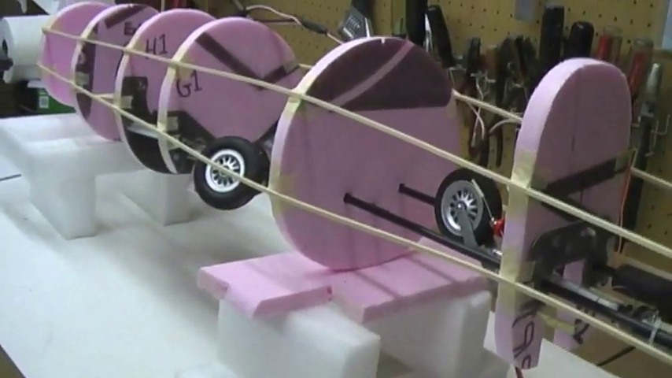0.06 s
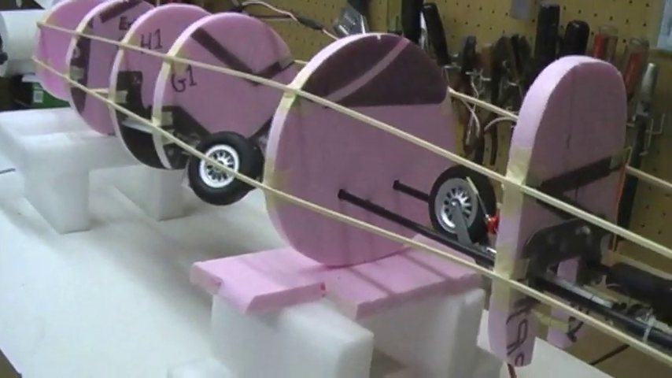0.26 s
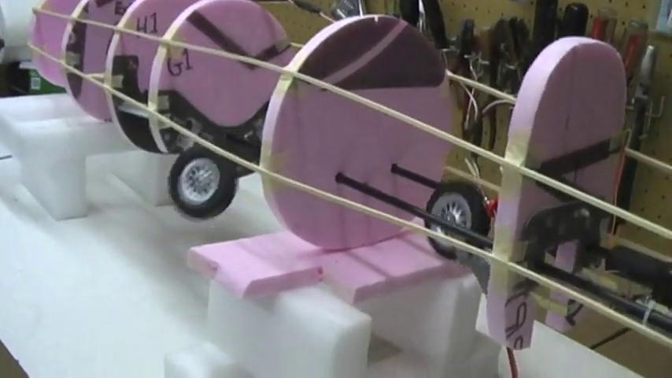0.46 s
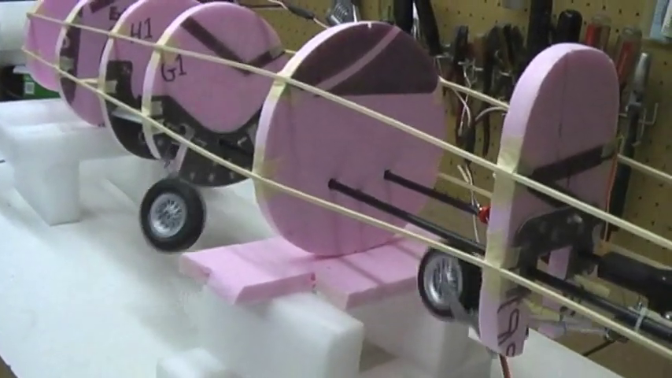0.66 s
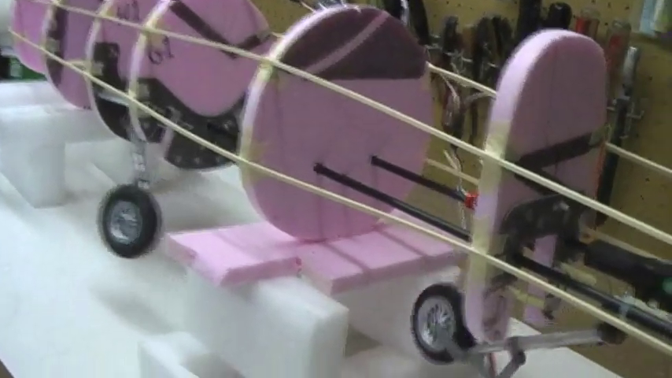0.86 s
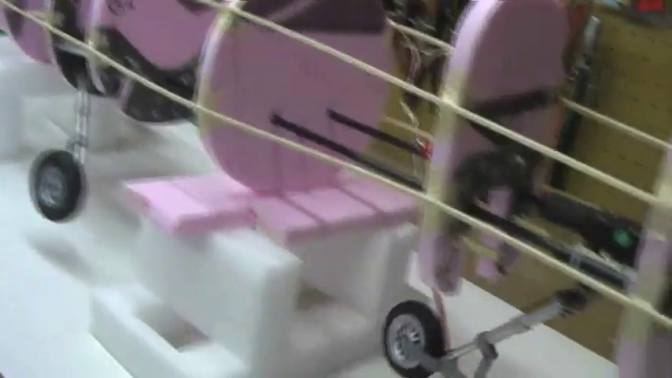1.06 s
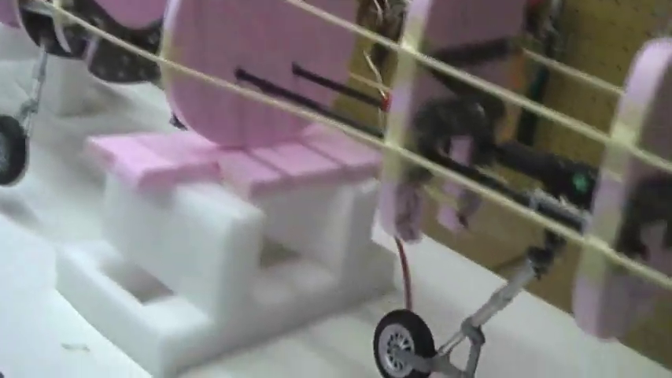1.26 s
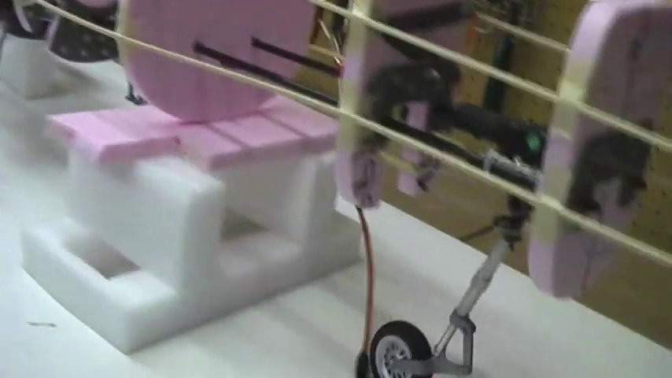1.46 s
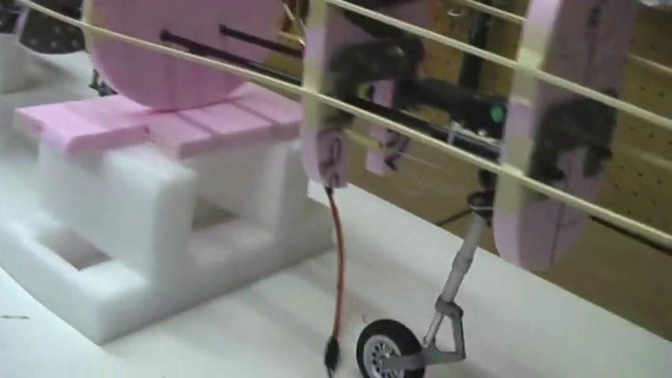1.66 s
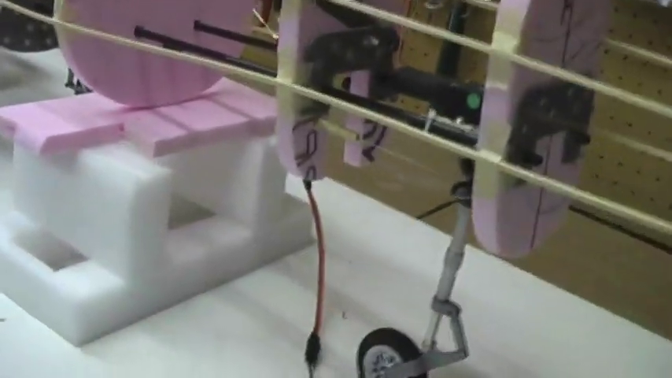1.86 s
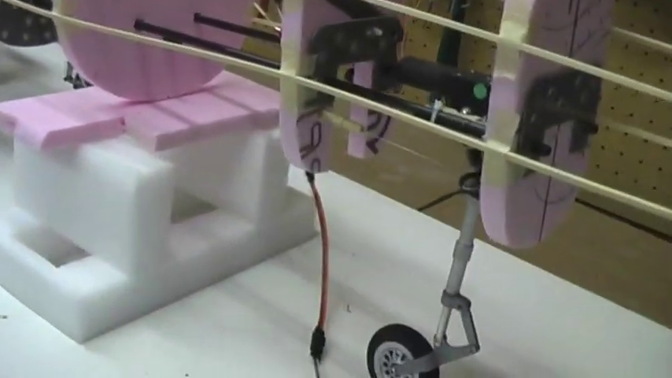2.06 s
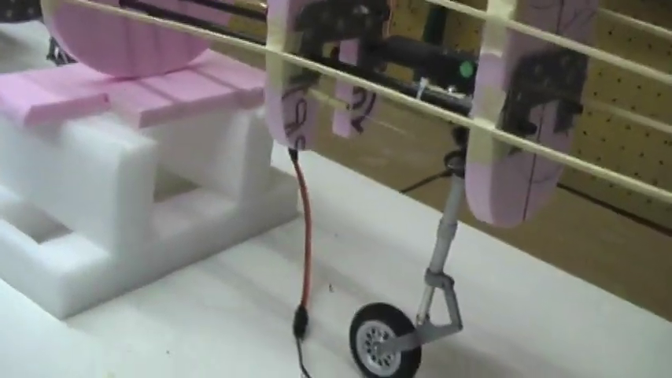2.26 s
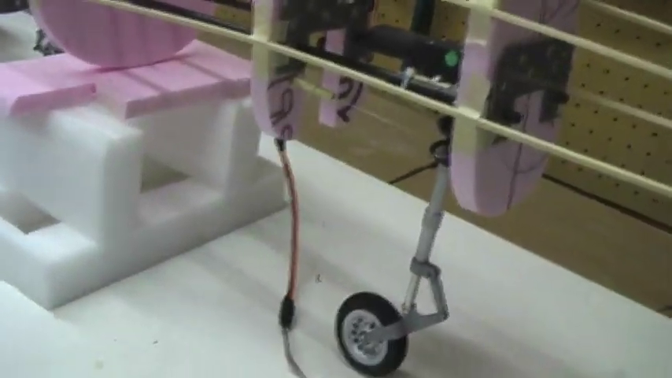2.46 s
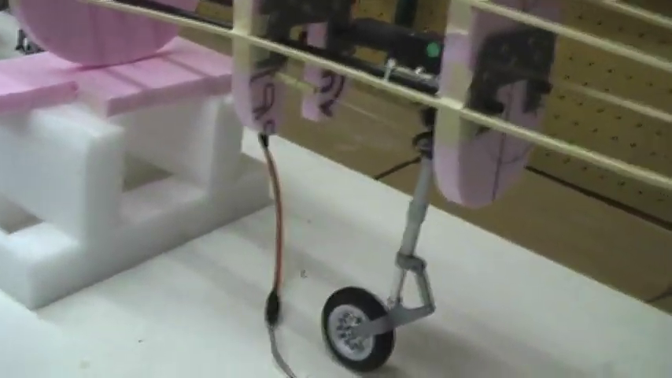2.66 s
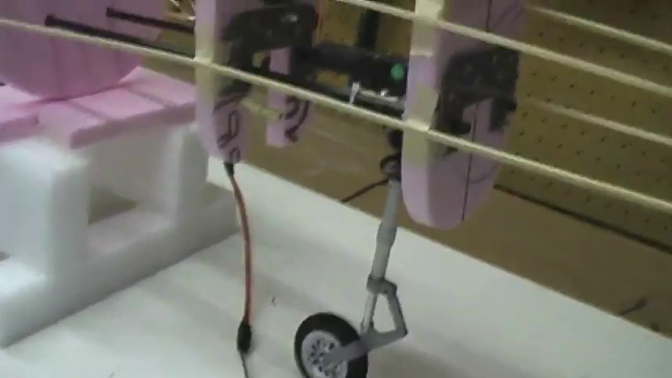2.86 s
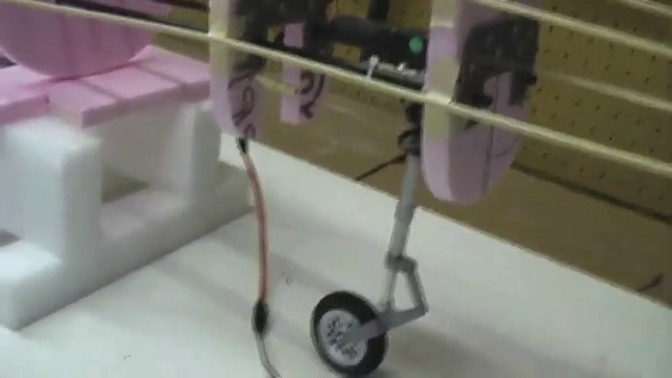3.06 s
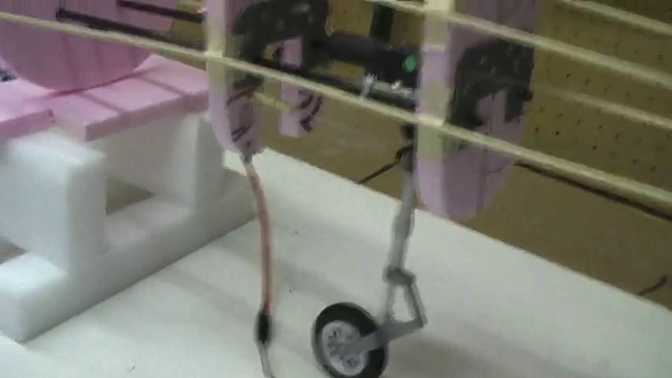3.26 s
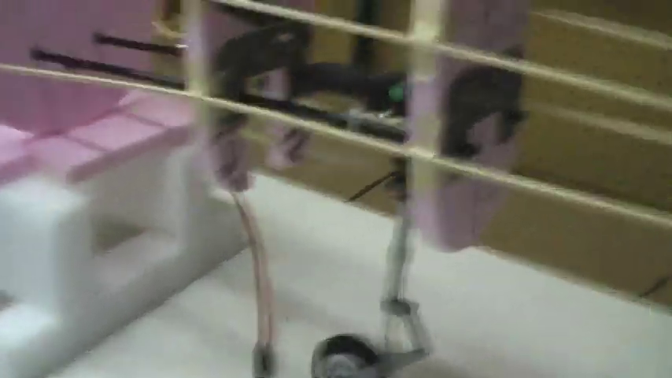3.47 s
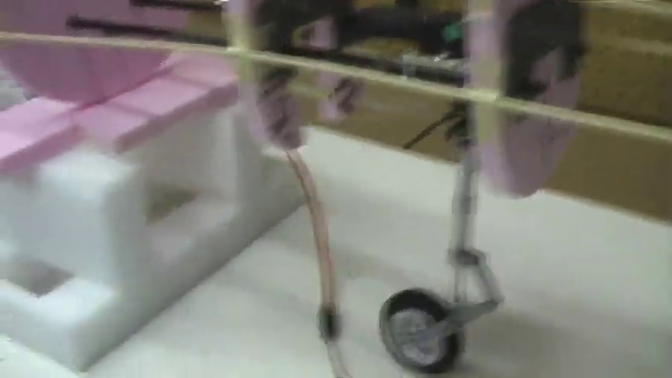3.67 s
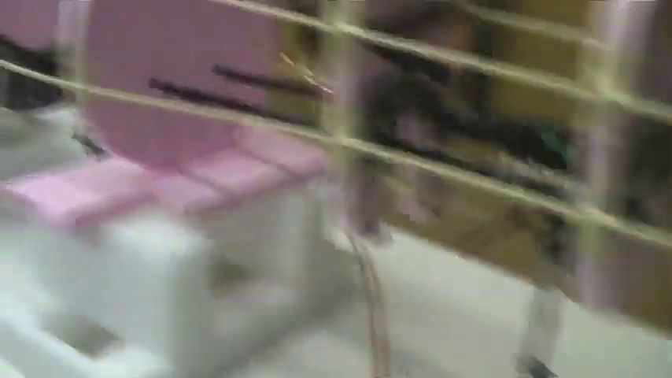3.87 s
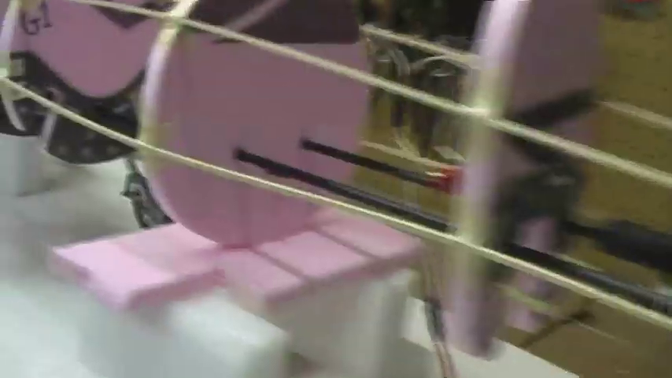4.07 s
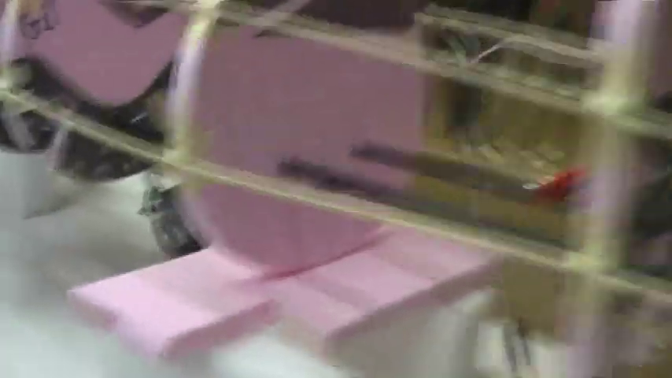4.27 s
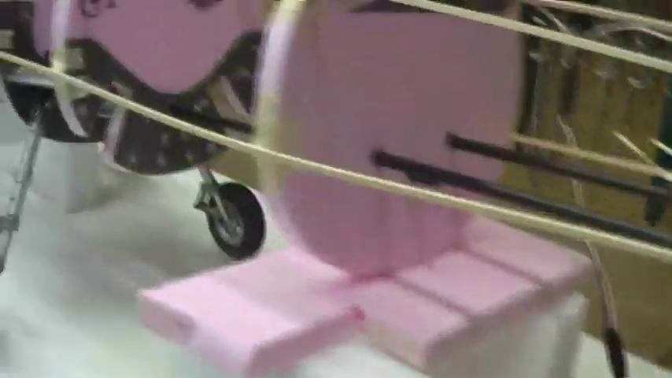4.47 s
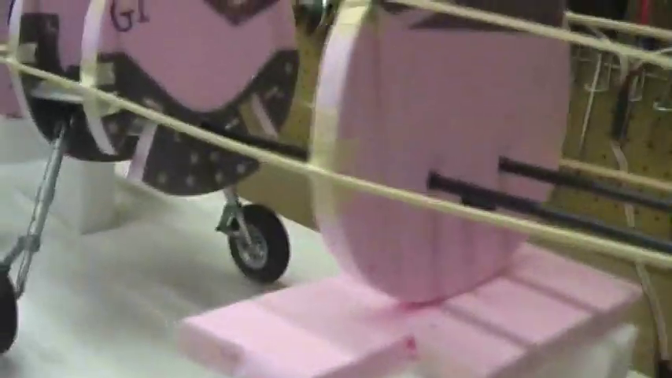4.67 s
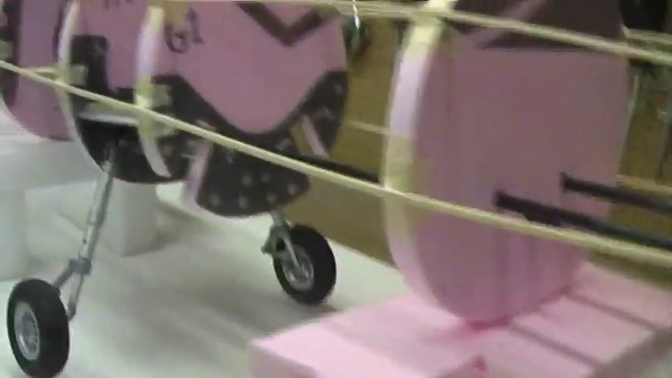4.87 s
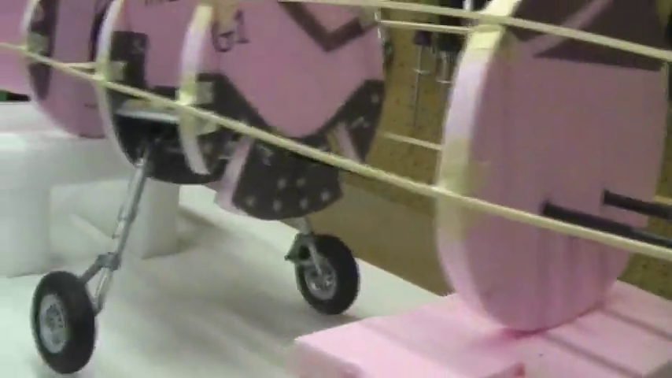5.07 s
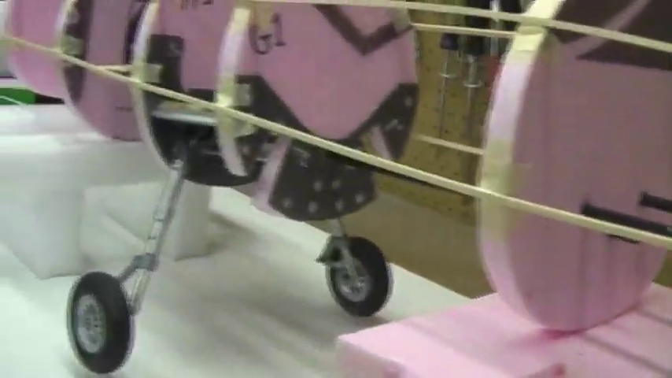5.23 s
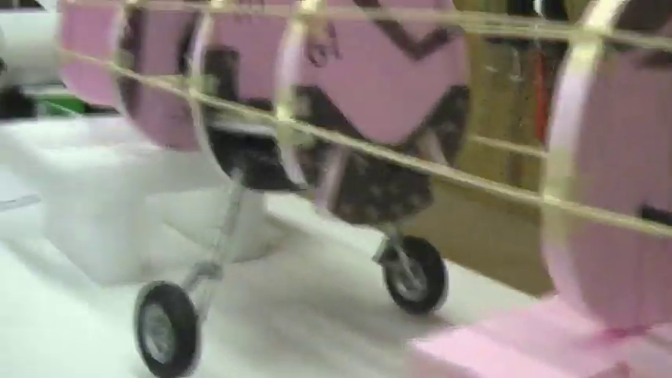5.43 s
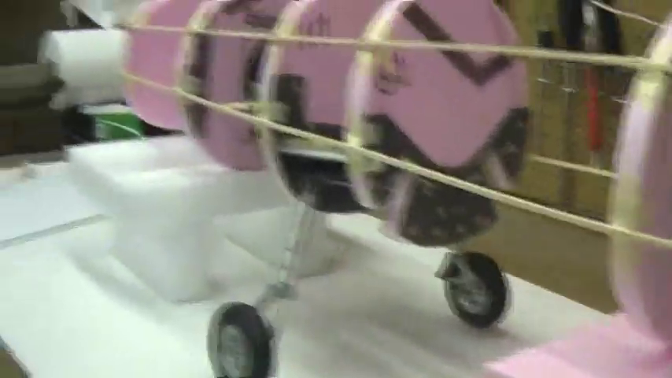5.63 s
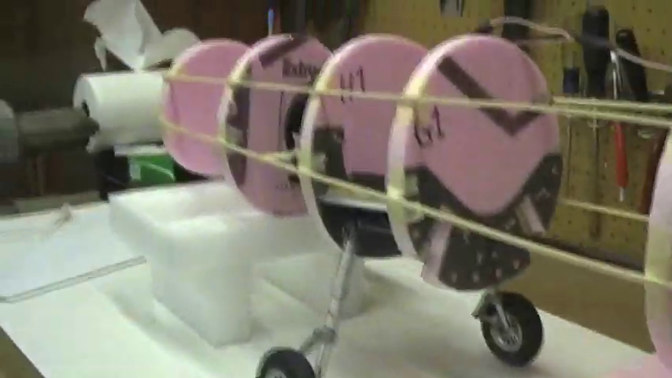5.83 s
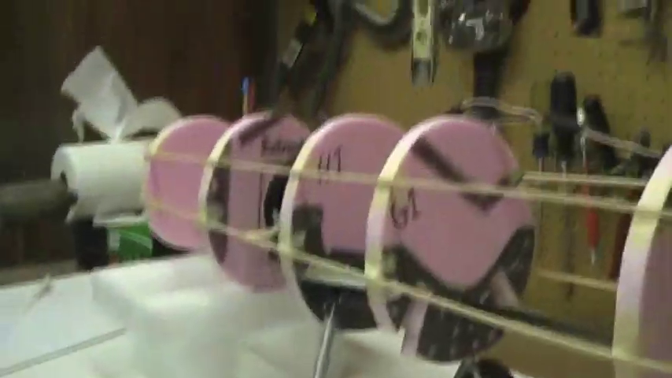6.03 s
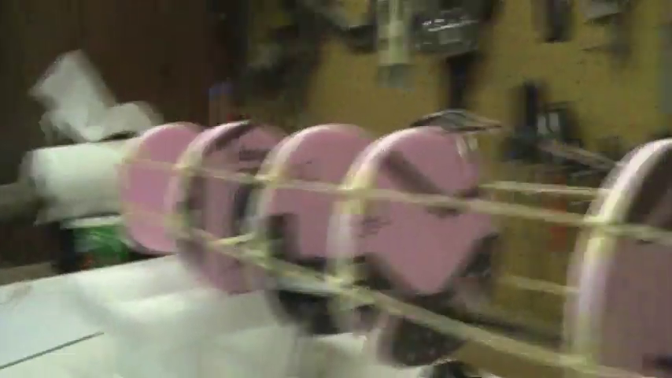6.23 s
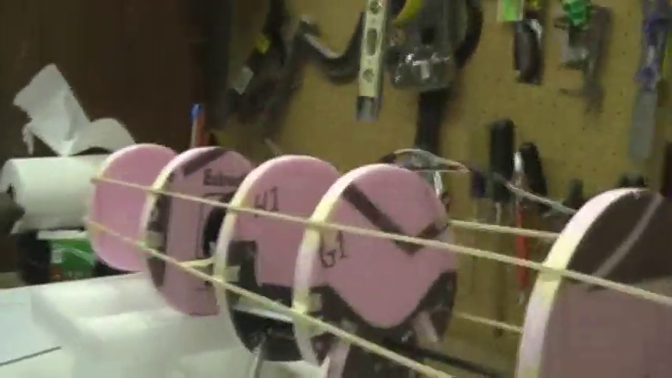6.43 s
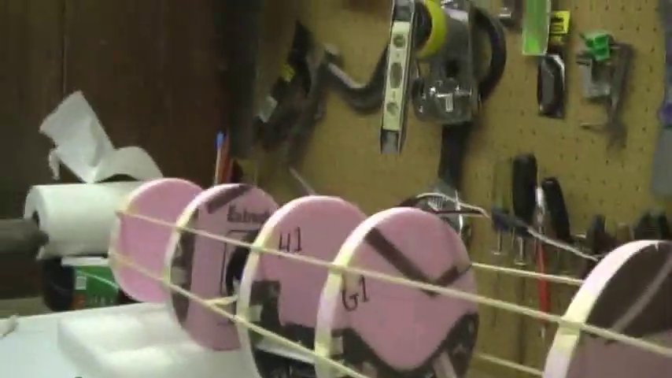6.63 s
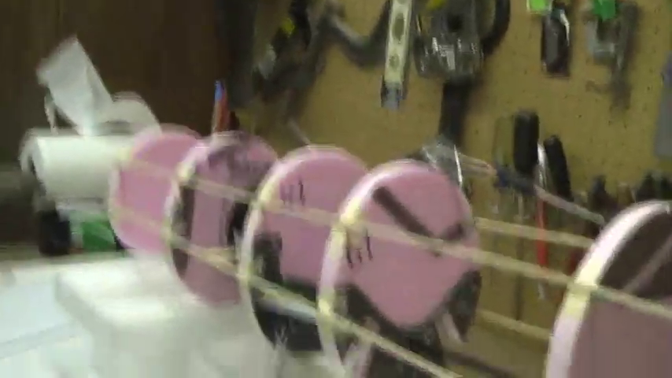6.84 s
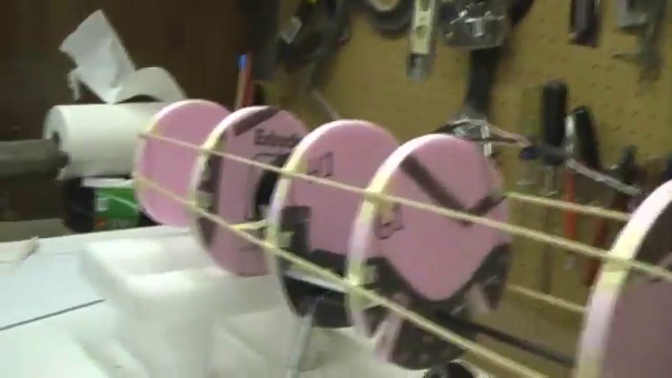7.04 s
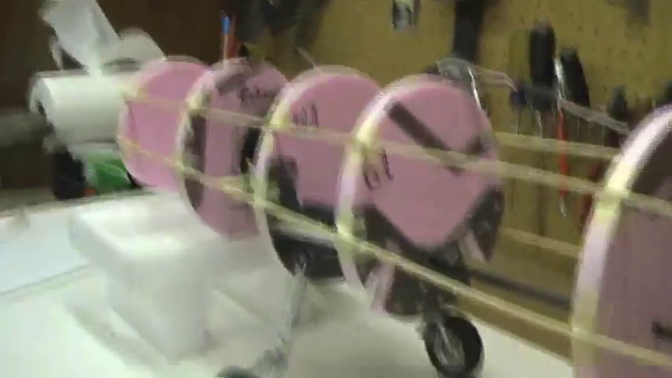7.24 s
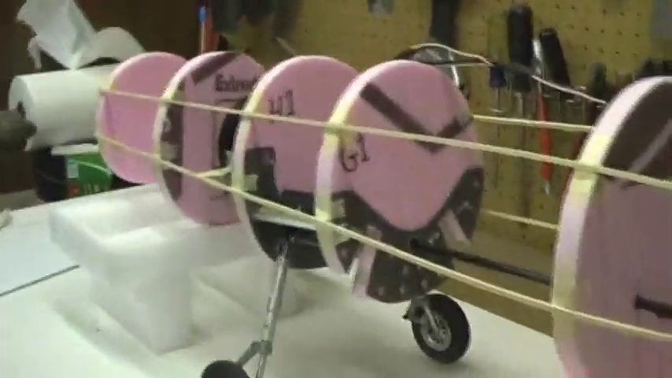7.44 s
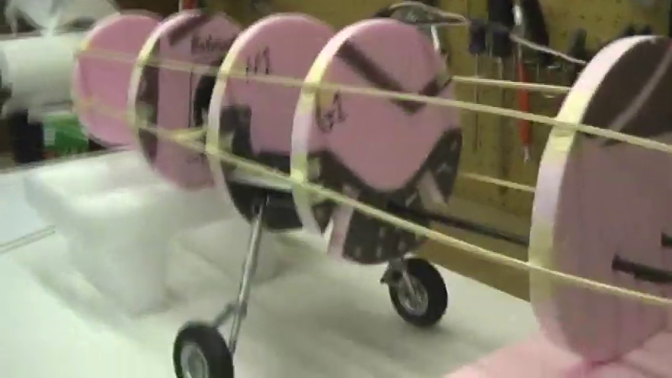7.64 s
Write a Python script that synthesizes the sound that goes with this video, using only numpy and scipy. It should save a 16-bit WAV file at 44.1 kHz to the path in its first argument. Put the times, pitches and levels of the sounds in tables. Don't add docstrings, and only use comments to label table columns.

```python
import sys
import numpy as np
from scipy import signal
from scipy.fft import rfft, irfft
from scipy.io import wavfile

SR = 44100
rng = np.random.default_rng(int(sys.argv[2]) if len(sys.argv) > 2 else 0)


def level_to_linear(level):
    exponent = np.asarray(level, float) / 20
    return 10 ** exponent


def materialize(psi):
    bounded = np.clip(np.atleast_2d(psi).T, -1, 1)
    quanta = np.round(bounded * 32767).astype(np.int16)
    wavfile.write(sys.argv[1], SR, quanta)


N = 339570
TIME = np.arange(N) / SR
BENCH = round(2.5 * SR)
SIZE = 3 * 2 ** 17
HZ = np.maximum(np.arange(SIZE // 2 + 1) * SR / SIZE, 1)

# (frequency [Hz], level [dB])
SHOP_COLOUR = [(20, -26.5), (50, -0.5), (100, 0.5), (160, -5.5), (400, -1.5), (1000, -5.5), (5000, -22),
               (11000, -20), (15500, -32.5)]
# (frequency [Hz], width [Hz], level [dB])
SHOP_HUM = [(145, 12, -76.5), (250, 5.7, -69), (400, 22, -64), (495, 30, -71.5)]
# (frequency [Hz], side minus mid [dB])
MOTOR_SIDE = [(60, -8.5), (150, -16), (380, -22), (950, -25.5), (2380, -21.5), (5980, -12), (15000, -1)]
NEAR_SIDE = [(60, -7), (150, -7), (380, -6.5), (950, -8), (2380, -6.5), (5980, -6), (15000, 2.5)]
# (time [s], left minus right [dB])
SIDE_STEP = [
    (0, -2.5),
    (6.3, 0),
    (6.7, 1),
    (7.7, 4.5),
]

# (frequency [Hz], level per Hz [dB])
CLOTH_COLOUR = [(59, -44), (100, -6.5), (429, -3.5), (654, -9.5), (1180, -5), (2300, -5), (4200, -21),
                (11500, -31.5), (13900, -35.5), (15500, -46.5)]
STRAP_COLOUR = [(59, -47), (100, -9.5), (214, -2.5), (614, -6.5), (808, -6.5), (1800, -0.5), (2520, -8),
                (5750, -4), (14500, -20), (15500, -27.5)]
# (time [s], rise [s], fall [s], level [dB], fineness [0 scuff, 1 swish, 2 crinkle, 3 hiss])
STROKES = [(.13, 0.12, 0.21, -57, 1.1), (3.25, 0.18, 2.2, -55, 0.32), (3.42, 0.34, 0.086, -54, .8),
           (3.47, 0.052, 0.11, -36.5, 1.41), (3.69, 0.075, 0.064, -43, 1.16),
           (3.758, .006, 0.23, -43, 0.41), (3.82, 0.053, 0.071, -32, 1.77),
           (3.92, 0.074, 0.23, -45.5, 0.37), (3.99, 0.077, 0.14, -49.5, 2.1),
           (4.1, 0.038, 0.093, -31, 1.06), (4.159, 0.054, 0.25, -51.5, 0.94),
           (4.38, 0.11, 0.065, -49.5, 2.47), (4.452, 0.22, 0.16, -52, 0.22),
           (4.483, 0.04, 0.089, -39.5, 1.36), (4.69, 0.17, .22, -49.5, 0.67), (4.66, 0.14, 0.34, -59, 2.69),
           (5.458, 0.1, 0.092, -51.5, 2.7), (5.7, 1.25, 1.06, -61.5, 1.28), (6.274, 0.022, 0.078, -42, 2.7),
           (6.45, 0.18, 0.23, -44, 2.62), (6.601, 0.7, 0.17, -52.5, 0.36),
           (6.675, 0.12, 0.15, -50.5, 0.089), (6.78, 0.25, .1, -56, 3.1)]
# (time [s], rise [s], fall [s], level [dB], fineness [0-3])
SLIDES = [(6.83, 0.061, 0.18, -53.5, .1), (6.853, 0.16, 0.22, -40, 2.13), (6.96, .2, 0.19, -62.5, .1),
          (7.04, 0.19, 0.68, -39.5, 2.1), (7.24, 0.51, .3, -41, 1.67), (7.258, .008, 0.064, -40.5, 2.3),
          (7.441, 0.38, 0.11, -37.5, 1.7), (7.45, 0.18, 0.29, -53.5, 0.11), (7.665, .06, .03, -43.5, 0.81),
          (7.7, .05, .1, -42, 2.1)]
# (time [s], length [s], ring [Hz], blur [Hz], level [dB])
SHOE_RUBS = [
    (3.08, .36, 515, 40, -50),
    (3.25, .13, 1310, 50, -54),
             (3.8, .09, 2202, 250, -37),
    (3.799, 0.064, 3440, 400, -40),
    (4.079, 0.065, 2140, 200, -33),
    (4.084, .04, 3140, 300, -37),
    (6.46, .2, 85, 35, -56),
    (6.55, .1, 170, 60, -56),
    (6.78, .2, 100, 40, -58),
    (7.36, .12, 85, 30, -62),
    (2.17, .06, 1650, 250, -40),
]

# (time [s], peak [dB], ring [Hz], t60 [s])
KNOCKS = [(3.756, -31.5, 458, 0.046), (3.891, -23, 250, 0.031), (3.916, -25.5, 333.5, 0.017),
          (4.065, -30, 337, 0.017), (4.411, -35, 650, 0.03), (4.43, -38.5, 1040, 0.037),
          (4.443, -38, 228.5, 0.087), (6.258, -37, 210.7, 0.066), (6.586, -29.5, 235, 0.023),
          (6.656, -16, 844, 0.016), (6.687, -34.5, 430, 0.019), (6.787, -20, 1265, 0.0085),
          (6.797, -16.5, 1395, 0.011), (6.816, -26.5, 327, 0.027), (6.849, -31, 202, 0.048),
          (6.885, -27, 354.7, 0.019), (6.942, -24, 217, 0.026), (6.967, -28.5, 204.6, 0.033),
          (7.618, -26, 520.4, 0.022), (7.651, -27.5, 609.4, 0.022)]
# (time [s], peak [dB], ring [Hz])
TICKS = [(4.1313, -25, 2230), (4.2389, -37, 2500), (4.4149, -39, 6890), (4.4308, -35, 2210),
         (5.1175, -46, 2400), (5.1205, -48, 5700), (6.2629, -33, 5570), (6.6115, -26.5, 4300),
         (6.6484, -19, 4530), (6.6551, -27, 4170), (6.786, -9.5, 5750), (6.7978, -22, 1830),
         (6.8061, -18.5, 7050), (6.8485, -22, 6750), (7.1769, -40, 6400), (7.228, -23, 5290),
         (7.2521, -14.5, 2650), (7.2522, -9.5, 4700), (7.2785, -13.5, 5340), (7.2965, -18, 5230),
         (7.3405, -24, 4260), (7.3375, -32, 4400), (7.3305, -34, 6000), (7.365, -20, 5680),
         (7.439, -21, 6340), (6.8189, -20.5, 10060), (7.6159, -27.5, 1880), (7.649, -21.5, 5800),
         (4.511, -32, 2190), (7.6954, -31, 5510), (3.673, -33, 1970), (4.064, -36, 2000)]
# (time [s], length [s], first pitch [Hz], last pitch [Hz], peak [dB])
CREAK = (4.366, .030, 330, 510, -31)
# (time [s], level [dB], t60 [s])
RATTLES = [
    (7.254, -29.5, 0.12),
    (7.2765, -31, .06),
    (7.297, -29.5, 0.099),
    (6.788, -32, 0.061),
    (6.6125, -37.5, 0.055),
]
# (frequency [Hz], width [Hz], level [dB])
BUCKLE = [(2500, 600, 2), (3630, 500, 1.5), (5340, 900, -1), (6160, 600, -6)]
# (time [s], peak [dB])
PINGS = [
    (4.954, -59),
    (5.117, -53),
    (5.1205, -51),
    (5.252, -57),
]
# (frequency [Hz], level [dB], t60 [s])
PART = [(1900, -2, .03), (2850, -3, .05), (4050, -9, .09), (5700, -3, .025), (6400, -6, .02),
        (8400, -4, .015)]

# (frequency [Hz], level per Hz [dB])
GEAR_COLOUR = [(100, -23.5), (500, -7), (900, -16.5), (1050, -10), (1400, -8), (3600, -9.5), (4500, -5.5),
               (9000, -7), (12000, -4), (14000, -13.5), (15500, -27)]
# (frequency [Hz], width [Hz], level [dB])
GEARBOX = [(1308, 160, -2.5), (2250, 200, -5), (4470, 300, -1), (5360, 250, -3), (6360, 310, -3),
           (9130, 1500, 4)]
# (turns per second [Hz], depth [0-1])
BEATS = [(218, 0.05)]
# (time [s], length [s], first pitch [Hz], last pitch [Hz], level against the rattle [dB])
WHINE = [(.34, .075, 4560, 4620, -5), (.345, .11, 5200, 5300, -3), (.33, .10, 9300, 9200, -5),
         (.345, .115, 4200, 6450, -2), (.38, .13, 6130, 6220, -7), (.39, .11, 4140, 4120, -7),
         (.42, .14, 4970, 5020, -9), (.33, .25, 5740, 5770, -12), (.33, .8, 1165, 1095, -16),
         (.33, .55, 1310, 1285, -14), (.82, .55, 1290, 1320, -10), (1.3, .65, 1345, 1320, -8),
         (.33, .1, 1910, 1850, -11), (.42, .35, 1890, 1950, -8), (.7, .52, 1945, 1975, -13),
         (.45, .55, 1530, 1550, -14), (.58, .6, 2335, 2345, -9), (1.2, .32, 2350, 2345, -9),
         (.68, .56, 2240, 2200, -10), (1.34, .4, 2190, 2255, -9), (.35, .6, 2910, 2850, -14),
         (.6, .4, 3160, 3190, -13), (1.06, .3, 3200, 3150, -12), (1.33, .4, 3165, 3230, -11),
         (.42, .26, 4390, 4335, -8), (.64, .36, 4320, 4385, -9), (.94, .47, 4385, 4350, -5),
         (1.39, .28, 4500, 4600, -6), (1.39, .32, 4410, 4455, -9), (.85, .45, 4020, 4070, -14),
         (.68, .28, 5240, 5320, -10), (1.14, .42, 5290, 5270, -11), (1.17, .2, 4920, 4945, -10),
         (.55, .46, 6480, 6460, -8), (.7, .32, 6640, 6690, -9), (.8, .42, 5760, 5740, -12),
         (1.4, .26, 6430, 6480, -12), (.5, .95, 8950, 8950, -7), (1.35, .35, 8800, 8700, -7),
         (2.18, .26, 4400, 4380, -3)]
# (time [s], rate [Hz])
SPEED = [
    (.32, 603),
    (.45, 650),
    (.75, 652),
    (1.0, 657),
    (1.35, 652.6),
    (1.55, 683),
    (1.72, 711),
    (1.9, 652),
    (2.3, 637),
]
# (time [s], rattle [dB])
BINDING = [
    (1.6, 0.0),
    (1.7, -3.0),
    (1.95, -5.5),
    (2.2, -6.5),
    (2.26, -1.0),
]
# (time [s], near train [dB], far train [dB])
EFFORT = [
    (.318, -42.5, -43),
    (.33, -28, -29),
    (.36, -17.5, -29.5),
    (.51, -19.5, -25.5),
    (1.3, -19, -25.5),
    (1.55, -21, -24.5),
    (1.83, -15.5, -24),
    (1.92, -21, -22),
    (2.14, -14.5, -24),
]
# one level [dB] each for rumble, rattle, buzz, hiss
NEAR_DB = [-43, -11.5, -8, 2]
FAR_DB = [-28, 1.5, -0.5, -15.5]
COAST_DB_PER_S = [250, 340, 279, 423.3]
# (time [s], rise [s], fall [s], level [dB])
SHAKES = [
    (.51, 0.083, 0.16, -42),
    (1.55, 0.13, 0.67, -51),
    (1.92, .6, .4, -45.5),
]
# (time [s], rise [s], fall [s], level [dB])
COMMUTATOR = [
    (.4, 0.11, .8, -55.5),
    (.97, 1.6, 0.61, -43),
    (1.55, 0.67, 0.34, -40.5),
    (1.8, .8, 0.18, -44),
]
# (time [s], rise [s], fall [s], level [dB])
SHAFT = [
    (.51, 0.24, 0.36, -54.5),
    (.8, 0.26, 0.22, -49.5),
    (1.27, 1.1, .14, -58),
    (1.55, 0.14, .35, -46.5),
    (1.8, 0.58, .1, -48.5),
]
# (time [s], length [s], first slip rate [Hz], last slip rate [Hz], ringing part [Hz])
CHATTER = [(1.648, .018, 1480, 1480, 8900), (1.674, .028, 1520, 1420, 8800),
           (1.699, .018, 1910, 1860, 5700), (1.714, .012, 1580, 1500, 4600), (1.75, .027, 1290, 1185, 8600),
           (1.773, .024, 2010, 1750, 5600), (1.79, .038, 1730, 1790, 8800), (1.826, .036, 1810, 1630, 5200),
           (1.828, .032, 1810, 1640, 8600), (1.861, .042, 1485, 1435, 4400),
           (1.862, .016, 1480, 1465, 8850), (1.904, .042, 1195, 1185, 6000),
           (1.934, .018, 1570, 1500, 4600), (1.95, .026, 1480, 1515, 4500), (1.966, .026, 1185, 1170, 7050),
           (1.995, .025, 1035, 1050, 5200), (2.02, .018, 1085, 1100, 6500), (2.024, .03, 1105, 1140, 4500),
           (2.052, .042, 1110, 1085, 4400), (2.08, .027, 1275, 1345, 5200), (2.1, .048, 1375, 1470, 4300),
           (2.097, .04, 1385, 1430, 8500), (2.142, .025, 1590, 1700, 8300), (2.155, .04, 1700, 1690, 5100),
           (2.162, .034, 1705, 1690, 8500), (2.195, .042, 1030, 1000, 3050)]


def rms_one(x):
    return x / np.sqrt(np.mean(x ** 2) + 1e-20)


def in_time(rows):
    s, *columns = np.transpose(rows)
    return [np.interp(TIME, s, c) for c in columns]


def shape_db(points):
    hz, db = np.transpose(points)
    return np.interp(np.log(HZ), np.log(hz), db)


def resonances(rows):
    return sum(level_to_linear(db) / (1 + (2 * (HZ - hz) / width) ** 2) for hz, width, db in rows)


def stride(x):
    return SIZE // (x.shape[-1] + SR // 4)


def filtered(x, response):
    step = stride(x)
    spectrum = rfft(x, SIZE // step) * response[..., ::step]
    return irfft(spectrum, SIZE // step)[..., :x.shape[-1]]


def between(low_hz, high_hz, hz):
    return 1 / np.sqrt((1 + (low_hz / hz) ** 12) * (1 + (hz / high_hz) ** 12))


def in_bands(x, response, edges, levels_db):
    step = stride(x)
    spectrum = rfft(x, SIZE // step) * response[::step]
    out = np.zeros(len(x))
    for db, low, high in zip(levels_db, edges, edges[1:]):
        band = irfft(spectrum * between(low, high, HZ[::step]), SIZE // step)[:len(x)]
        out += level_to_linear(db) * rms_one(band)
    return out


def drift(rate_hz, count=N):
    r = np.exp(-2 * np.pi * rate_hz / SR)
    slow = signal.lfilter([1], [1, -2 * r, r * r], rng.standard_normal(count + 8000))[8000:]
    return rms_one(slow - slow.mean())


def grains(per_s, spread_db, count=N):
    sizes = level_to_linear(spread_db * np.minimum(rng.exponential(1, count), 4)) * rng.standard_normal(count)
    return sizes * (rng.random(count) < per_s / SR)


def ring(hz, t60, count):
    t = np.arange(count) / SR
    return np.sin(2 * np.pi * hz * t) * level_to_linear(-60 * t / t60)


def swells(rows, colour_db=0.0):
    s, rise, fall, db = np.array(rows)[:, :4].T[..., None]
    t = TIME[::64]
    level_db = db + colour_db - 20 * np.maximum((s - t) / rise, (t - s) / fall)
    return np.interp(TIME, t, 10 * np.log10(np.sum(level_to_linear(2 * level_db), axis=0) + 1e-12))


def add(out, s, piece):
    i = round(s * SR)
    out[i:i + len(piece)] += piece[:len(out) - i]


def spread(mid, side_table):
    smear = rng.standard_normal(3000) * np.exp(-np.arange(3000) / 500)
    reflections = rfft(smear / np.linalg.norm(smear), SIZE)
    side = filtered(mid, level_to_linear(shape_db(side_table)) * reflections)
    side = side * np.sqrt(2) * np.cos(2.0 * drift(3.3))
    return np.array([mid + side, mid - side])


def shop():
    mid_db = shape_db(SHOP_COLOUR)
    colours = level_to_linear([mid_db, mid_db + shape_db(NEAR_SIDE)])
    mid, side = filtered(rng.standard_normal((2, N)), colours)
    hum = sum(level_to_linear(db) * drift(width) * np.sin(2 * np.pi * hz * TIME) for hz, width, db in SHOP_HUM)
    gain = level_to_linear(-57.5 - 2.5) / mid.std()
    return hum + gain * np.array([mid + side, mid - side])


def room(x):
    t60_s, level_db = 0.35, -21
    t = np.arange(SR // 2) / SR
    tail = rng.standard_normal((2, SR // 2)) * level_to_linear(-60 * t / t60_s) * (t > .004)
    tail /= np.linalg.norm(tail, axis=1, keepdims=True)
    return level_to_linear(level_db) * filtered(x, rfft(tail, SIZE) / np.sqrt(1 + (HZ / 4000) ** 2))


def small_parts():
    out, t = np.zeros(N), np.arange(SR // 8) / SR
    contacts = rms_one(filtered(grains(2500, spread_db=4.5, count=SR), resonances(BUCKLE)))
    for k, (s, db, t60) in enumerate(RATTLES):
        add(out, s, level_to_linear(db - 60 * t / t60) * contacts[k * len(t):(k + 1) * len(t)])
    lucks_db = rng.normal(0, 2.4, (len(PINGS), len(PART)))
    for (s, db), luck in zip(PINGS, lucks_db):
        for (hz, mode_db, t60), own in zip(PART, luck):
            add(out, s, level_to_linear(db + mode_db + own) * ring(hz, t60, count=len(t)))
    return out


def drag():
    out = np.zeros(N)
    for s, length, hz, blur_hz, db in SHOE_RUBS:
        n = round(length * SR)
        tone = drift(blur_hz, count=SR)[:n] * np.sin(2 * np.pi * hz * TIME[:n])
        add(out, s, level_to_linear(db) * signal.windows.tukey(n, .5) * tone)
    return out


def rubbing():
    coarser_db, finer_db, most_db = 10, 7.5, 16.5
    strap_s = 6.79
    rows = np.array(STROKES + SLIDES)
    steps = np.arange(4)[:, None] - rows[:, 4]
    loss_db = np.minimum(np.maximum(finer_db * steps, -coarser_db * steps), most_db)
    levels_db = np.array([swells(rows, -loss[:, None]) for loss in loss_db])
    levels_db = levels_db + [[4.5], [-.4], [-.4], [-.4]]
    fibres = grains(22000, spread_db=2.0) * level_to_linear(1.3 * drift(34))
    crinkles = grains(14000, spread_db=1.8) * level_to_linear(1.5 * drift(49.47))
    edges = [110, 900, 3500, 7500, 16000]
    cloth = in_bands(fibres, level_to_linear(shape_db(CLOTH_COLOUR)), edges, levels_db)
    strap = in_bands(crinkles, level_to_linear(shape_db(STRAP_COLOUR)), edges, levels_db)
    return np.where(TIME < strap_s, cloth, strap) * ((TIME < .31) | (TIME > 2.9))


def knocks():
    out, t = np.zeros(N), np.arange(3000) / SR
    puffs = signal.lfilter([.3], [1, -.85], rng.standard_normal((len(KNOCKS), len(t))))
    for (s, db, hz, t60), puff in zip(KNOCKS, puffs):
        modes = ring(hz, t60, count=len(t)) + .4 * ring(1.9 * hz, 0.5 * t60, count=len(t))
        add(out, s, level_to_linear(db + 2.0) * (modes + 0.315 * puff * level_to_linear(-60 * t / (3.7 * t60))))
    return out


def ticks():
    t60, crack_width_hz = .009, 3000
    out, t = np.zeros(N), np.arange(3000) / SR
    r = np.exp(-np.pi * crack_width_hz / SR)
    for s, db, hz in TICKS:
        crack = rng.standard_normal(len(t)) + 7 * (t == 0)
        resonator = [1, -2 * r * np.cos(2 * np.pi * hz / SR), r * r]
        for _ in range(2):
            crack = signal.lfilter([1, 0, -1], resonator, crack)
        crack = rms_one(crack) * level_to_linear(-60 * t / t60)
        add(out, s, level_to_linear(db - 1.5) * (.5 * ring(hz, t60, count=len(t)) + .5 * crack))
    return out


def creak():
    out = np.zeros(N)
    s, length, first_hz, last_hz, db = CREAK
    u = np.linspace(0, 1, round(length * SR))
    swell = np.sin(np.pi * u ** 1.35)
    turns = np.cumsum(first_hz + (last_hz - first_hz) * u) / SR
    add(out, s, level_to_linear(db) * swell * np.sin(2 * np.pi * turns))
    return out


def case():
    bass_cut = (1j * HZ / 170 / (1 + 1j * HZ / 170)) ** 2
    treble_cut = 1 / (1 + 1j * HZ / 12000) ** 2
    return filtered(knocks() + ticks() + creak(), bass_cut * treble_cut)


def chatter():
    out = np.zeros(BENCH)
    wobble, flutter = drift(250, count=BENCH), drift(180, count=BENCH)
    wander = drift(26, count=BENCH)
    k = np.arange(1, 13)
    lucks_db = rng.normal(0, 1, (len(CHATTER), 12))
    for (s, length, first, last, hz), luck in zip(CHATTER, lucks_db):
        db = -19 + 5.5 * np.log2(hz / 9000)
        db -= 2.5 * (5000 < hz < 7200)
        i, n = round(s * SR), round(length * SR)
        slips = np.cumsum(np.linspace(first, last, n)) / SR
        slips += .028 * wobble[i:i + n] + .08 * wander[i:i + n]
        harmonic_hz = k * first
        near_db = np.maximum(-30 * np.abs(np.log2(k * (first + last) / 2 / hz)), -8) + 1.5 * luck
        near_db -= 4 * (harmonic_hz < 3900) * (hz > 3900) + 5 * (harmonic_hz < 1150)
        near_db -= 4 * (harmonic_hz > 10500) + 40 * (harmonic_hz > 13500)
        own = (i + 1999 * k[:, None] + np.arange(n)) % BENCH
        phase = 2 * np.pi * np.outer(k, slips) + .8 * flutter[own[::-1]] + 9 * luck[:, None]
        burst = np.sum(level_to_linear(near_db[:, None] + 3 * flutter[own]) * np.sin(phase), axis=0)
        add(out, s, level_to_linear(db + 2.5 + 1.5 * flutter[i:i + n]) * signal.windows.tukey(n, .4) * burst)
    return out


def gear_levels():
    near_off_s, far_off_s, far_sag_db_per_s = 2.19, 2.243, 47.5
    near_db, far_db = in_time(EFFORT)
    coast = np.array(COAST_DB_PER_S)[:, None]
    far_db = far_db - far_sag_db_per_s * np.maximum(TIME - EFFORT[-1][0], 0)
    near = near_db + np.array(NEAR_DB)[:, None] - 3.0 * coast * np.maximum(TIME - near_off_s, 0)
    far = far_db + np.array(FAR_DB)[:, None] - coast * np.maximum(TIME - far_off_s, 0)
    power = level_to_linear(2 * near) + level_to_linear(2 * far)
    power[0] += level_to_linear(2 * swells(SHAKES))
    return 10 * np.log10(power + 1e-9)[:, :BENCH]


def gear_rattle(gears_db, edges):
    t = TIME[:BENCH]
    beat = 1
    for rate, depth in BEATS:
        beat = beat + depth * np.sin(2 * np.pi * (rate * t + 0.3 * drift(5.8, count=BENCH)))
    contacts = grains(20000, spread_db=-0.4, count=BENCH) * beat * level_to_linear(0.4 * drift(66, count=BENCH))
    levels_db = gears_db + [[3.5], [-3.0], [-3.0], [-3.0]] + in_time(BINDING)[0][:BENCH]
    dead_band = 1 - .55 / (1 + ((HZ - 3620) / 90) ** 2)
    colour = level_to_linear(shape_db(GEAR_COLOUR)) * (1 + 0.85 * resonances(GEARBOX)) * dead_band
    return in_bands(contacts, colour, edges, levels_db)


def gear_whine(gears_db, edges):
    out = np.zeros(BENCH)
    waver = 1 + .0025 * drift(7, count=BENCH)
    for s, length, first_hz, last_hz, db in WHINE:
        i, n = round(s * SR), round(length * SR)
        band = np.searchsorted(edges, first_hz) - 1
        level_db = db + 2.5 + gears_db[band][i:i + n]
        turns = np.cumsum(np.linspace(first_hz, last_hz, n) * waver[i:i + n]) / SR
        steady = .75 * (1500 < first_hz < 7000)
        blur_hz = 18 + 200 * (first_hz / 9000) ** 3
        blur = drift(blur_hz, count=BENCH // 2 + 8000)[:n]
        strength = steady + np.sqrt(1 - steady ** 2) * blur
        add(out, s, level_to_linear(level_db) * signal.windows.tukey(n, .4) * strength * np.sin(2 * np.pi * turns))
    return out


def motor_tones():
    turns = np.cumsum(in_time(SPEED)[0][:BENCH]) / SR
    commutator = level_to_linear(swells(COMMUTATOR)[:BENCH] + 1.5) * (1.0 + 0.76 * drift(30, count=BENCH))
    shaft = level_to_linear(swells(SHAFT)[:BENCH] + 4.0) * (1.1 + 0.36 * drift(7, count=BENCH))
    return commutator * np.sin(2 * np.pi * turns) + shaft * np.sin(2 * np.pi * turns / 3)


def motors():
    t, gears_db = TIME[:BENCH], gear_levels()
    edges = [150, 950, 3500, 7000, 16000]
    out = gear_rattle(gears_db, edges) + gear_whine(gears_db, edges) + motor_tones()
    return out * (t > .3175) * np.clip((2.43 - t) / .05, 0, 1)


def scene():
    background = shop()
    hand = case()
    lean = level_to_linear(np.outer([.5, -.5], in_time(SIDE_STEP)[0]))
    near = spread(hand + rubbing() + drag() + small_parts(), NEAR_SIDE) * lean
    bench = np.pad(motors() + chatter(), (0, N - BENCH))
    return spread(bench, MOTOR_SIDE) + near + room(bench + 0.5 * hand) + background


def low_pass(x):
    return signal.sosfilt(signal.butter(12, 15990, fs=SR, output="sos"), x)


def record(dry):
    drive_hz, memory, top_hz = 300, .8, 15450
    delay = np.exp(-2j * np.pi * HZ / drive_hz)
    repeats = (1 - memory) * delay / (1 - memory * delay)
    depth = .85 / (1 + (HZ / 6000) ** 4) * (HZ > drive_hz / 2)
    bass_cut = (1j * HZ / 45 / (1 + 1j * HZ / 45)) ** 2
    treble_cut = 1 / (1 + (HZ / top_hz) ** 80)
    flattened = 0.82 * np.tanh(dry / 1.017)
    mix = filtered(flattened, (1 - depth * repeats) * bass_cut * treble_cut)
    return low_pass(mix)


dry = scene()
out = record(dry)
materialize(out)
```